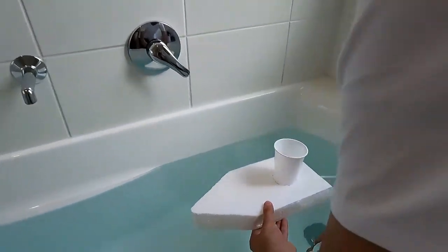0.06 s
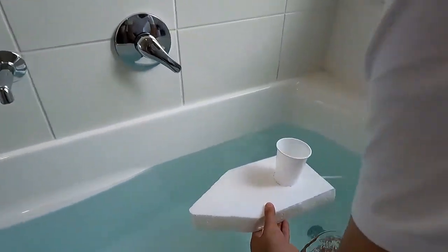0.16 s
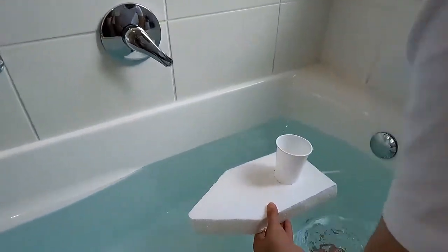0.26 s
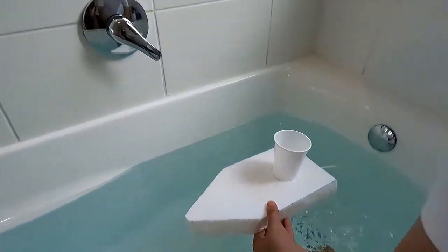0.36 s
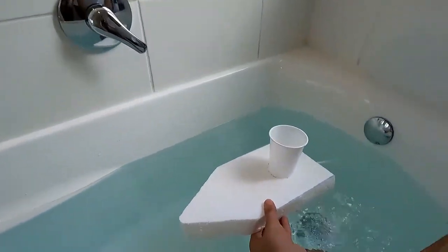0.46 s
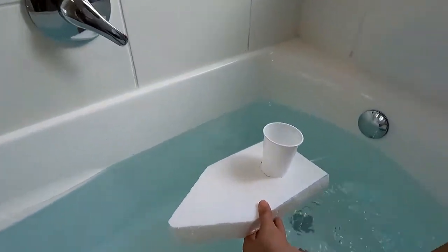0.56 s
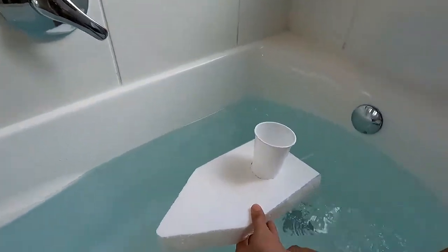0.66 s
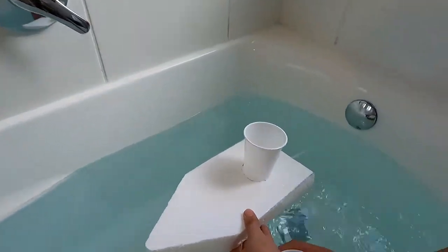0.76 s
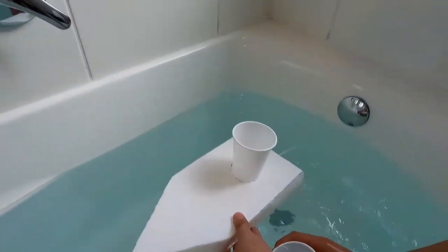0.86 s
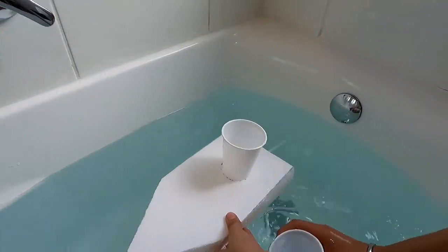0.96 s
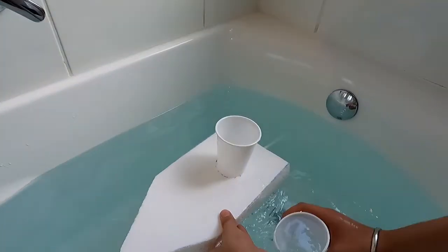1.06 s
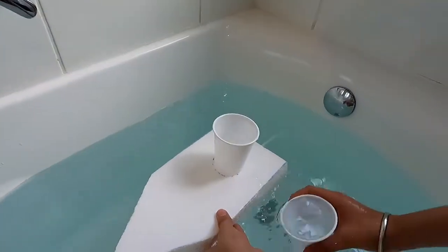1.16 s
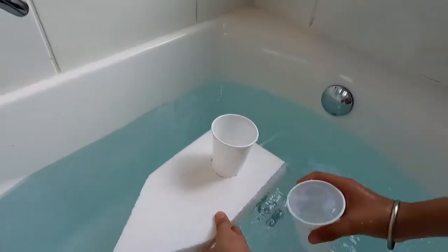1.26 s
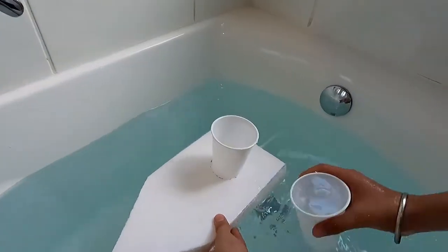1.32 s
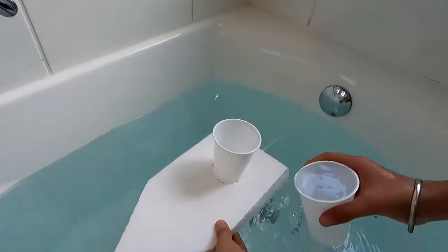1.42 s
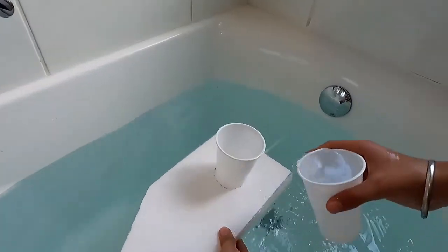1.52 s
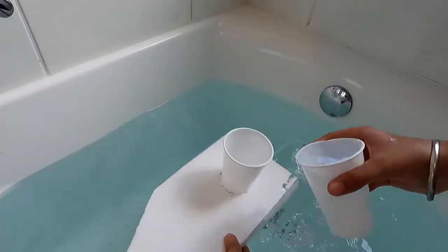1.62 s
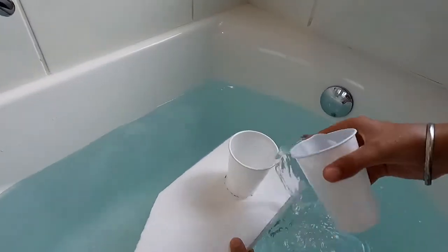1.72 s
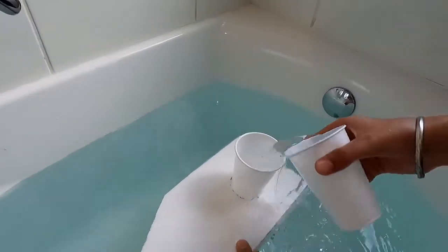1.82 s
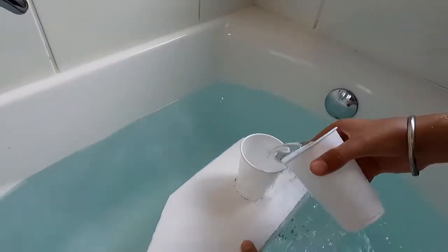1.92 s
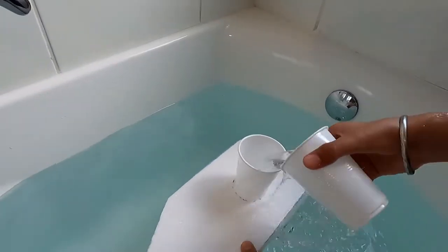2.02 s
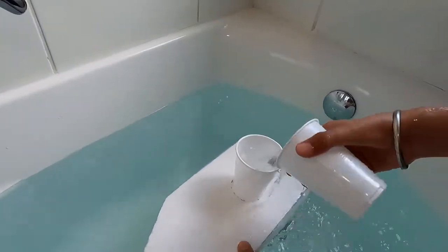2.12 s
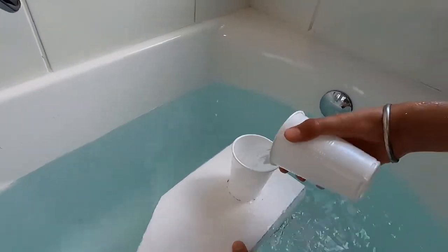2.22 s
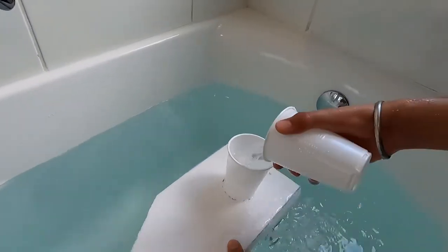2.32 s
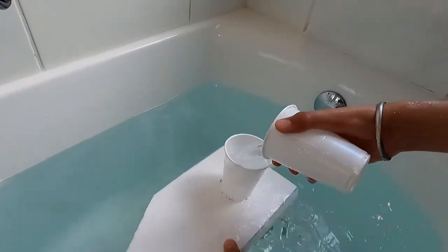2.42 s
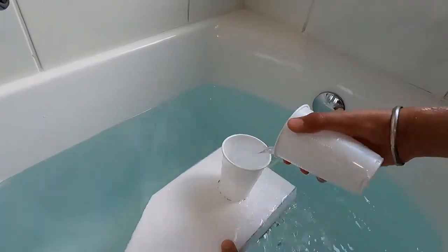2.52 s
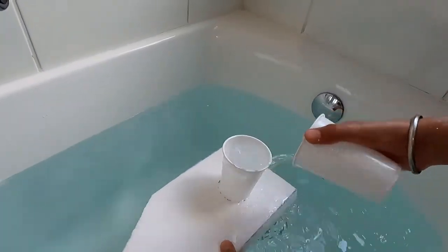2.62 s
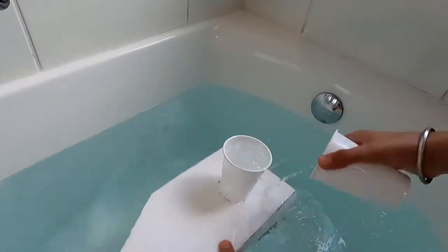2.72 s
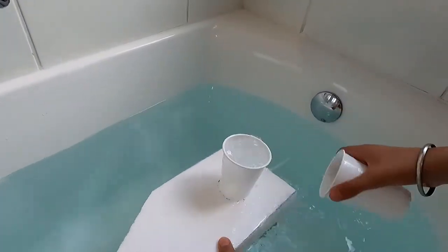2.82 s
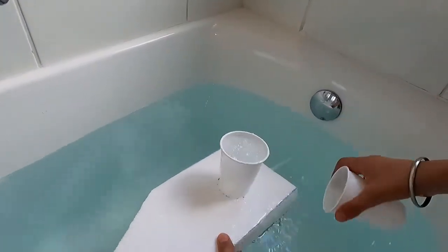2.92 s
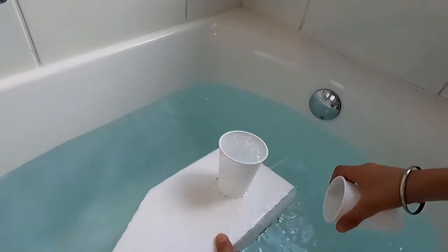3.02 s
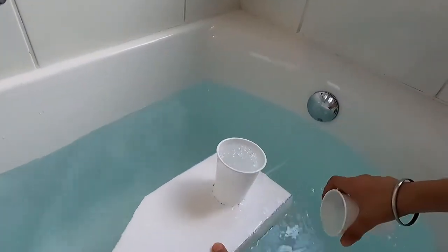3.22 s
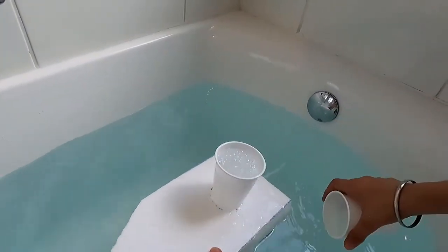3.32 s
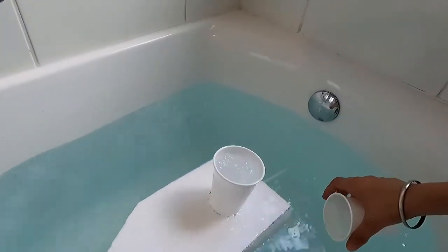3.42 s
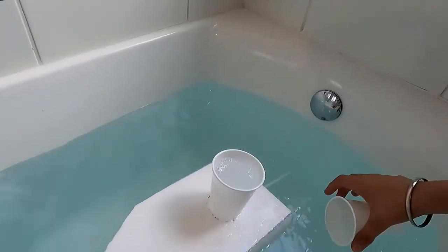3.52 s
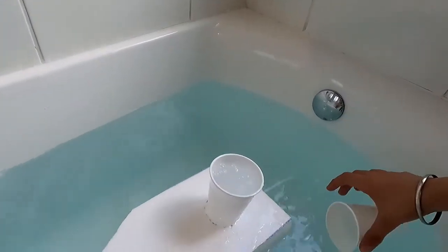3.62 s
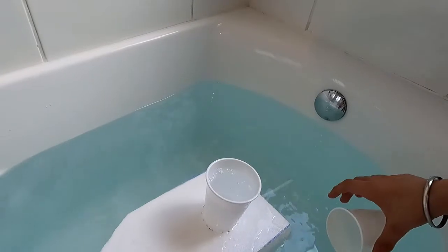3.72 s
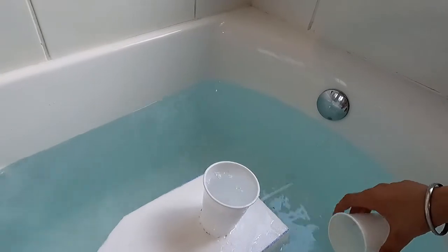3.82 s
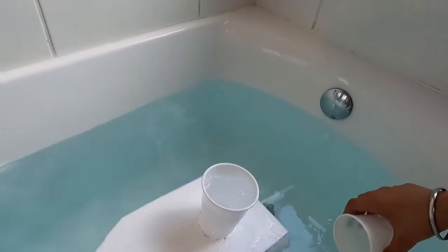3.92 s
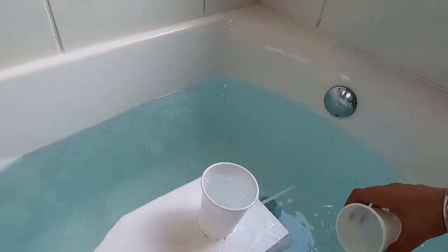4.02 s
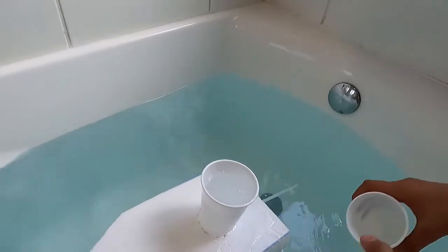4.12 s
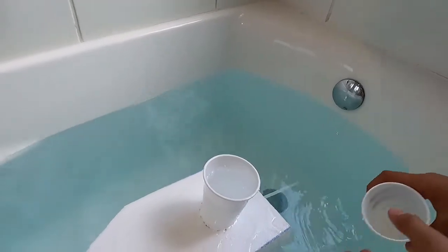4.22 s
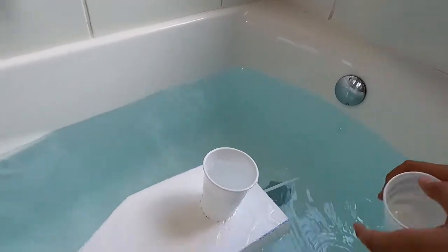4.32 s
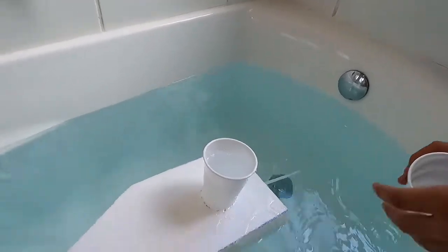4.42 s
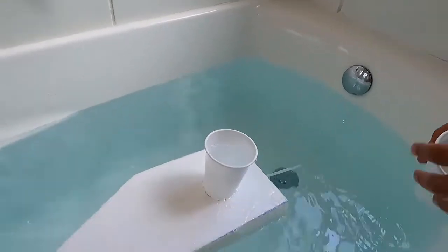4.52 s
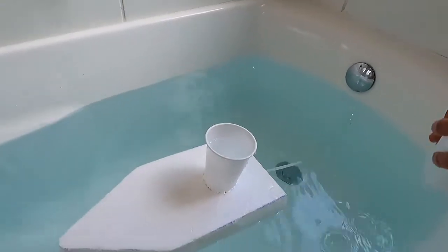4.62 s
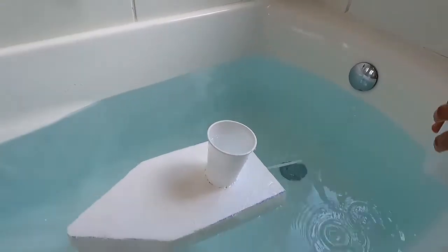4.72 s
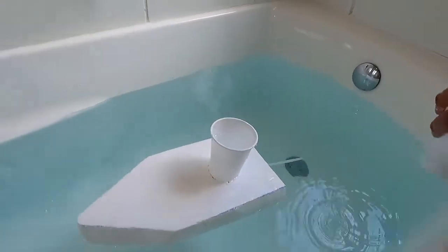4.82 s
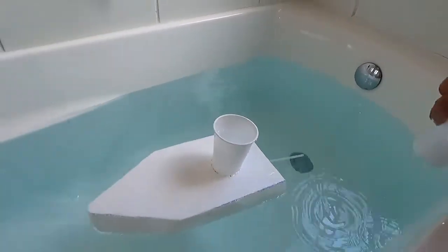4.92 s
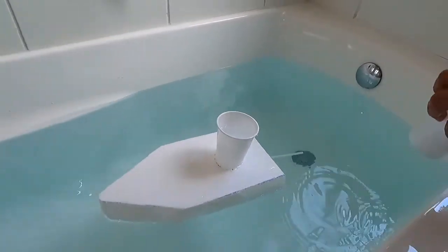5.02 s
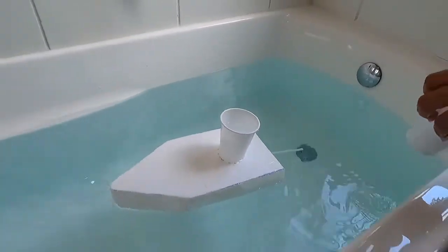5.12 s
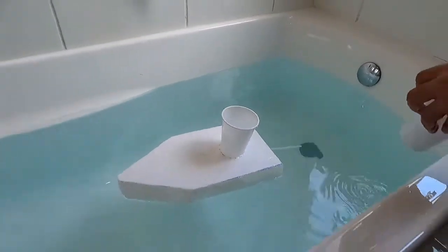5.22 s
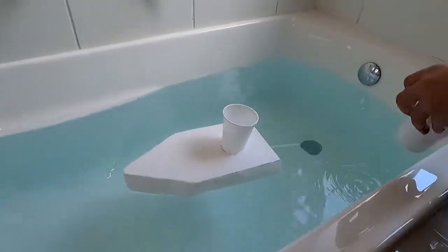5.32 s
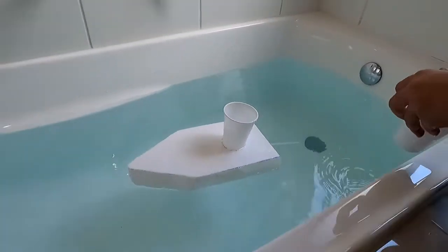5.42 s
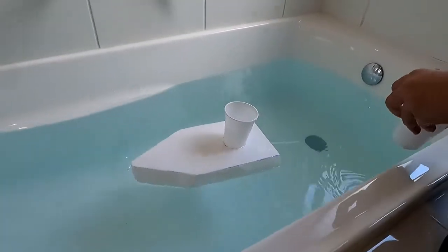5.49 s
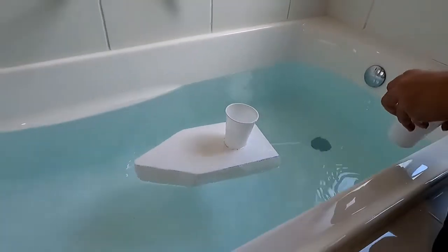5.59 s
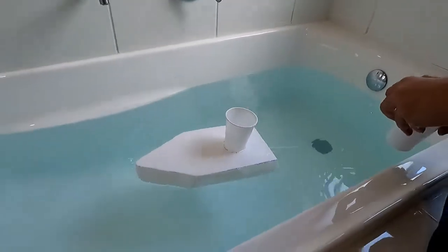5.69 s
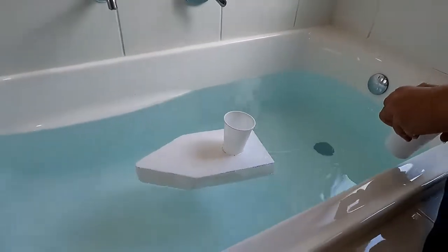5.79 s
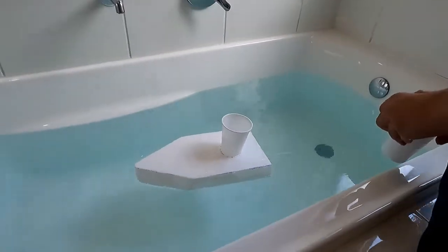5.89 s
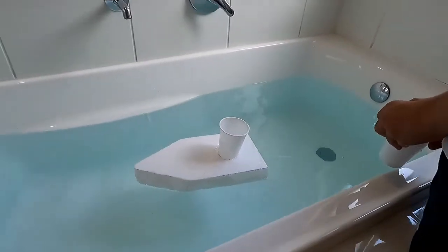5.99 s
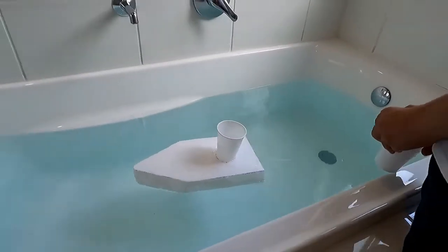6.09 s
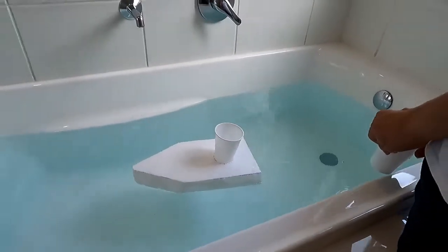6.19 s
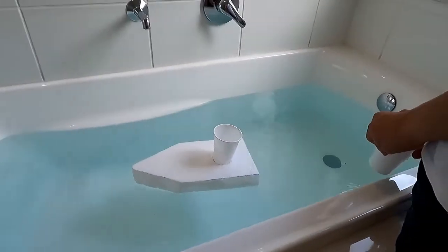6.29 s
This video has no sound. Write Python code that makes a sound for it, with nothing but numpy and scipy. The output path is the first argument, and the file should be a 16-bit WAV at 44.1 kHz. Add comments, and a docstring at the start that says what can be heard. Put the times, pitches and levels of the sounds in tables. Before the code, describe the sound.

A quick deep glug resonates in the bathtub, followed by plinking drops and a sharp wet splat. Bubbly pouring spatters for about a second, then trickles away into faint droplets. A crisp double click rings, fabric rubs beside the microphone amid soft low thuds, and a single dry knock sounds. Tiles add a bright short reverberation over faint low room noise.

```python
"""A plastic cup dipped into a full bathtub gulps at a mostly rising pitch: its shrinking air excites the tub.
Drops fall, then the cup is emptied into a second cup and over the water, and a late double click rings; bubbles
are damped sines whose crowds make gurgle, slosh and fizz, and the tiled bathroom adds echoes and a decaying tail.
Later clothes rustle and rub as shaped noise and a single knock sounds, over low lumps and faint room noise."""
import sys
import numpy as np
from scipy import signal
from scipy.fft import rfft, irfft, next_fast_len
from scipy.io import wavfile
from scipy.ndimage import map_coordinates

SR = 44100
rng = np.random.default_rng(int(sys.argv[2]) if len(sys.argv) > 2 else 0)


def file_out(sig):
    """Save sig as 16-bit WAV at sys.argv[1]."""
    # one column per channel
    cols = np.atleast_2d(sig).T
    # limit, then scale
    lim = np.clip(cols, -1, 1)
    pcm = np.round(lim * 32767).astype(np.int16)
    wavfile.write(sys.argv[1], SR, pcm)


N = 280035

KNOCK_S = 5.2525
STREAM_END_S = 3.8


def gulp():
    """Cavity resonance: as the sinking cup's air shrinks its note climbs and, with the churn, excites the tub."""
    # air pocket of the dipped cup: t/s, mean pitch f/Hz, relative level/dB
    air_pocket = [(.07, 134.2, -40), (.115, 152.6, -30), (.17, 184.6, -38), (.21, 237.1, -32),
                  (.245, 255.5, -32), (.258, 350, -24.5), (.285, 402, -23.5), (.3, 410.5, -38.5),
                  (.345, 418, -26.5), (.356, 581, -25.5), (.41, 586, -31)]
    # air modes of tub and room: f/Hz, width/Hz, relative level/dB
    tub_modes = [(182, 14, -15), (250.7, 6.3, -3), (282, 8.3, -16), (340, 12, -3), (401, 12.3, -9),
                 (433, 7.5, -9.5), (578, 21, -13.5), (730, 59, -19)]
    # water rushing into the cup: f/Hz, relative level/dB
    churn_spectrum = [(30, -9), (80, -10.5), (250, 2), (450, -5), (800, -10.5), (1500, -11), (3000, -53)]
    hz, db = curves(air_pocket)
    t = np.arange(N) / SR
    fade_in = np.clip((t - air_pocket[0][0]) / 0.025, 0, 1)
    fade_out = np.clip((air_pocket[-1][0] - t) / 0.036, 0, 1)
    wavering_hz = hz * (1 + 0.018 * wobble(61.3))
    note = np.sin(2 * np.pi * np.cumsum(wavering_hz) / SR)
    churn = amp(3.5 * wobble(44.5) - 17.0) * rush(churn_spectrum, side_db=-20.5)
    air = fade_in * fade_out * amp(db) * (note + churn)
    flutter = amp(15.0 + 4 * wobble(29.35))
    return amp(-8.5) * air + flutter * filtered(air, resonances(tub_modes))


def stream():
    """Bubble acoustics of running water: gurgle at the cup's air pitch, deep slosh, crackling fizz and a hiss."""
    # surges: t/s, full flow lasts t/s, relative gurgle level/dB, relative fizz level/dB, gurgle f/Hz,
    # climb/(Hz/s), pitch spread/log ratio, fizz f/Hz
    surges = [(0, 0.093, -72, -52.5, 1150, -5.5, 0.14, 6400), (0.25, 0.13, -39, -52, 1397, -800, .3, 3800),
              (0.409, 0.016, -30.5, -37, 2334, -300, 0.16, 3800),
              (.56, 0.22, -49.5, -46, 1827, -900, 0.3, 5600),
              (0.8, 0.22, -42.5, -40.5, 1149, 906.5, 0.27, 6200),
              (1.45, 0.15, -68, -50.5, 2010, -900, .15, 4500),
              (1.851, 0.018, -39, -28.5, 1450, -300, 0.27, 4500),
              (1.97, 0.057, -34.5, -32, 1015, 292, .15, 4200), (2.15, 0.18, -29, -32, 1302, 201, .11, 4000),
              (2.562, 0.16, -39, -40, 2210, 589.5, 0.25, 4000),
              (3.04, 0.015, -41.5, -42, 1964, -500, 0.19, 4500)]
    # stirring of the bath water: t/s, full level lasts t/s, level/dB
    stirrings = [(.36, 0.054, -41), (1.97, 0.46, -47.5)]
    # hiss: f/Hz, relative level/dB
    hiss_spectrum = [(410, -55), (700, -18), (1160, -4), (1290, -15), (1870, -2.5), (4890, -15.5),
                     (12300, -22), (15500, -72)]
    s, held, gurgle_db, fizz_db, start_hz, climb, spread, fizz_hz = np.transpose(surges)
    t = np.arange(N) / SR
    # the latest surge sets the pitch, from 40 ms before its full flow
    k = np.clip(np.searchsorted(s - .04, t) - 1, 0, None)
    hz = start_hz[k] + climb[k] * np.clip(t - s[k], 0, held[k] + 0.19)
    gurgle = swarm(count=3500, hz=hz, spread=spread[k], cycles=7.1, uneven_db=7, size=800)
    slosh = swarm(count=4000, hz=np.full(N, 700.), spread=np.full(N, 0.5), cycles=2.7, uneven_db=1.5, size=1100)
    fizz = swarm(count=24000, hz=fizz_hz[k], spread=np.full(N, 0.3), cycles=4.2, uneven_db=6.5, size=180)
    hiss = rush(hiss_spectrum, side_db=-1.0) * amp(0.69 * wobble(29.26) - 1.5)
    gurgle_gain = swells(s, held, gurgle_db - 4.5, rise=260, fall=81)
    slosh_gain = swells(*np.transpose(stirrings), rise=500, fall=46)
    fizz_gain = swells(s, held, fizz_db - 6.5, rise=500, fall=51)
    return gurgle_gain * gurgle + slosh_gain * slosh + fizz_gain * (fizz + hiss)


def drops():
    """Entrained bubbles ring under falling drops, struck cup walls ring longer, and splats add noisy spray."""
    # bubbles under single drops: t/s, starting f/Hz, relative level/dB, ring/cycles to -20 dB
    drop_bubbles = [(.2375, 1247, -27.5, 12.4), (0.2358, 1734, -29.5, 36), (0.3376, 4670, -31, 17),
                    (0.356, 1505, -23, 14), (.357, 3550, -31.5, 23), (0.3877, 1130, -11, 3.8),
                    (0.388, 2900, -17.5, 17), (.3897, 2240, -20, 11), (.4031, 2004, -5.5, 5.1),
                    (.4031, 2393, -13, 11), (0.6051, 1050, -28, 5.8), (.803, 2300, -24, 5.5),
                    (.811, 1105, -12, 3.8), (.8633, 923, -22.5, 8.4), (0.8872, 1250, -22.5, 7.5),
                    (.904, 2660, -11.5, 3.7), (.9626, 3600, -22.5, 11.6), (.969, 6240, -18, 6.4),
                    (0.9826, 1181, -9, 8.1), (.9817, 2060, -18, 12), (0.984, 4600, -23, 9.5),
                    (1.009, 1250, -22, 18), (1.098, 5760, -29, 11), (1.19, 2850, -33, 8.4),
                    (1.394, 1880, -45.5, 29), (1.3951, 4430, -8, 7.8), (1.3958, 6730, -10, 8.9),
                    (1.3946, 11600, -11.5, 8.2), (1.5262, 3830, -17.5, 4.8), (1.5479, 1950, -31.5, 15),
                    (1.7152, 1670, -37, 19), (1.7341, 3890, -22.5, 6.2), (1.79, 3280, -27, 8.4),
                    (1.8079, 5000, -12, 5.3), (1.818, 5960, -24, 10), (1.8261, 1992, -8.5, 20),
                    (1.8261, 2400, -19, 21), (1.839, 1080, -24.5, 20), (1.8695, 794, -34, 21),
                    (1.8915, 4700, -23, 19), (1.962, 1025, -20.5, 6.7), (1.9974, 4730, -6.5, 3),
                    (2.0657, 1580, -17, 7.4), (2.092, 3700, -13.5, 6.5), (2.147, 5960, -11.5, 4.7),
                    (2.2546, 1294, -12, 7.7), (2.255, 11200, -32, 16), (2.271, 3500, -11.5, 4.2),
                    (2.3043, 2340, -12.5, 4.7), (2.3316, 1290, -8, 2.3), (2.334, 5070, -10.5, 3.4),
                    (2.495, 3900, -25, 8.8), (2.5658, 4100, -22, 13), (2.567, 845, -22, 3.4),
                    (2.611, 3380, -24, 5.9), (2.681, 1297, -27.5, 7.5), (2.684, 2440, -31, 10),
                    (2.712, 2330, -35, 18), (2.7477, 826, -26, 2.8), (2.7619, 386, -31, 2.8),
                    (2.7625, 2480, -21, 6.7), (2.8585, 2050, -19.5, 4.2), (2.9305, 4640, -14.5, 3),
                    (2.9865, 3770, -18, 3.2), (3.0264, 1860, -18.5, 9.1), (3.0261, 2530, -18.5, 6.9),
                    (3.0442, 2120, -19.5, 10.3), (3.139, 8700, -36, 18), (3.146, 3100, -26, 5.9),
                    (3.219, 932, -35.5, 4.4), (3.3735, 1855, -24.5, 5.2), (3.392, 4950, -22.5, 4.9),
                    (3.5525, 4580, -28.5, 6.6), (3.957, 1144, -48.5, 8.5), (4.215, 5070, -33, 2.4),
                    (4.261, 9500, -34.5, 4), (4.241, 10600, -33.5, 6.6), (5.201, 3190, -37, 4.6),
                    (5.4894, 4000, -28.5, 4.5), (5.529, 4470, -30, 5.2)]
    # drops that strike a cup and leave its wall ringing: t/s, f/Hz, mean level/dB, ring/cycles to -20 dB
    wall_rings = [(1.547, 1800, -47.5, 180), (1.5487, 2010, -46.5, 170), (1.7144, 1652, -43, 200)]
    # bursts of fine spray: t/s, relative level/dB
    splats = [(.523, -40.5), (0.6065, -33.5), (0.9087, -28.5), (0.97, -28), (1.02, -35), (1.098, -36.5),
              (1.347, -40.5), (1.395, -17), (1.7316, -30), (1.756, -29), (1.8894, -29), (2.061, -36),
              (2.0901, -20), (2.148, -27), (2.269, -21), (2.3351, -25.5), (2.569, -29.5), (2.671, -26.5),
              (2.7611, -36), (2.817, -33), (2.859, -31.5), (2.9832, -35), (3.027, -35), (3.045, -46),
              (3.143, -35), (3.375, -31), (3.551, -37)]
    # spray: f/Hz, gain/dB
    spray_spectrum = [(800, -35), (2500, 3), (5000, 9.5), (9000, -1), (12000, -6.5), (15500, -12)]
    s, hz, db, cycles = np.transpose(drop_bubbles)
    pan_db = 1.124 * rng.standard_normal(len(s))
    plinks = bubbles(s, hz, cycles, amp(db + 5.0), pan_db, rise=0.027, size=4000)
    s, hz, db, cycles = np.transpose(wall_rings)
    rings = amp(2.5 * wobble(50)) * bubbles(s, hz, cycles, amp(db), 0 * hz, rise=0, size=12000)
    spray = bursts(*np.transpose(splats), attack=0.0015, t60=0.019, spectrum=spray_spectrum)
    return plinks + rings + spray


def ticks():
    """Strong damping: the faint, bright droplets shed by the wet cup last only a few cycles."""
    # droplets: t/s, relative level/dB, starting f/Hz
    droplets = [(3.7984, -49, 5570), (3.824, -45, 6400), (3.8824, -48, 3360), (3.9348, -39, 6900),
                (3.956, -44.5, 3530), (3.9904, -46, 4460), (4.0304, -43, 4360)]
    s, db, hz = np.transpose(droplets)
    return bubbles(s, hz, 1.8 + 0 * s, amp(db + 15), rng.standard_normal(len(s)), rise=0.066, size=200)


def double_click():
    """Damped oscillation: two close clicks, probably a late drop, with a fluttering ring near 1 and 2.3 kHz."""
    # ring of the double click: f/Hz, mean level over the click/dB, ring/cycles to -20 dB
    ring_modes = [(940, -25, 140), (970, -28, 140), (1019, -22, 113), (2340, -5, 15), (2312, -28, 130)]
    # clicks: f/Hz, gain/dB
    click_spectrum = [(800, -22), (2000, 5.5), (4500, 6.5), (7300, 8), (9000, -8.5), (15500, -20.5)]
    first_s, base_db = 4.307, -22.5
    hz, db, cycles = np.transpose(ring_modes)
    ring = bubbles(np.full(len(hz), first_s), hz, cycles, amp(base_db + db), 0 * hz, rise=0, size=12000)
    # a stronger click follows the first by 3.9 ms
    click_s = first_s + np.array([0, 0.0039])
    click_db = base_db + np.array([-2., 4.])
    clicks = bursts(click_s, click_db, attack=0.0019, t60=0.014, spectrum=click_spectrum)
    return amp(4.5 * wobble(60)) * ring + clicks


def person():
    """Friction noise: clothes rustle and rub in broad bands; low lumps are noise split into deep and thud."""
    # movements by the tub: t/s, held t/s, mean rustle level/dB, mean rub level/dB
    moves = [(3.959, 0.028, -62.5, -55), (4.33, 0.05, -52.5, -72), (4.5, 0.11, -52, -81),
             (4.8, 0.088, -59, -58), (4.94, 0.064, -48.5, -56), (5.1, 0.11, -53.5, -48.5),
             (5.28, 0.058, -46.5, -56), (5.489, 0.055, -48, -55), (5.64, 0.076, -58, -60),
             (5.83, 0.06, -54.5, -59), (5.961, 0.12, -67.5, -59.5), (6.221, 0.084, -68.5, -65.5)]
    # rustle: f/Hz, relative level/dB
    cloth_spectrum = [(350, -15), (600, -14.5), (1100, -5.5), (2600, -9.5), (3570, -12.5), (7000, -18),
                      (12500, -36), (15500, -30)]
    # rub: f/Hz, relative level/dB
    rub_spectrum = [(100, -43), (150, -2), (260, 1.5), (400, -6), (800, -14.5), (1300, -39), (2000, -64)]
    # low lumps: t/s, held t/s, deep level/dB, thud level/dB
    jolts = [(.09, 0.1, -66, -45.5), (.9, 0.075, -62, -57), (4.18, 0.081, -59, -54.5),
             (4.38, 0.022, -46.5, -71), (4.57, 0.034, -61, -42.5), (4.781, 0.021, -63, -51.5),
             (4.96, 0.017, -70, -56.5), (5.18, 0.11, -51, -74), (5.33, 0.1, -53, -72),
             (5.62, .03, -68, -56), (5.74, 0.076, -56, -66), (5.93, 0.18, -53.5, -54.5),
             (6.199, 0.24, -52.5, -60.5)]
    # lumps before the split: f/Hz, relative level/dB
    rumble_spectrum = [(12, -54.5), (25, -9), (70, -2), (110, -11), (200, -10.5), (400, -85)]
    s, held, rustle_db, rub_db = np.transpose(moves)
    grain = amp(1.5 * wobble(37))
    cloth = swells(s, held, rustle_db, rise=285, fall=79) * grain * rush(cloth_spectrum, side_db=-5.5)
    rub_grain = amp(0.25 * wobble(48))
    rub = swells(s, held, rub_db, rise=330, fall=140) * rub_grain * rush(rub_spectrum, side_db=-7)
    s, held, deep_db, thud_db = np.transpose(jolts)
    rumble = amp([[-1.5], [1.5]]) * rush(rumble_spectrum, side_db=-17.0)
    deep = filtered(rumble, lambda hz: 1 / (1 + (hz / 41.4) ** 6))  # split at 41.4 Hz
    thud = rumble - deep
    deep_lumps = swells(s, held, deep_db, rise=350, fall=240) * unit(deep)
    thud_lumps = swells(s, held, thud_db, rise=350, fall=240) * unit(thud)
    return cloth + rub + deep_lumps + thud_lumps


def knock_crack():
    """Impulsive excitation: the knock opens with a very short broadband burst."""
    # crack: f/Hz, gain/dB
    crack_spectrum = [(300, 9), (1000, 14), (2500, 10.5), (6000, 8.5), (9000, -20), (15500, -27)]
    burst = bursts(np.array([KNOCK_S]), np.array([-20]), attack=0.00016, t60=0.0086, spectrum=crack_spectrum)
    return amp([[-1.5], [1.5]]) * burst


def knock_body():
    """Damped modes: two low tones swell and die just after the crack of the knock."""
    # low modes of the knocked case: f/Hz, relative level/dB, t60/s
    case_modes = [(38, -25.5, 0.18), (131, -11, 0.026)]
    t = np.maximum(np.arange(N) / SR - KNOCK_S - .003, 0)
    modes = sum(amp(db - 60 * t / t60) * np.sin(2 * np.pi * hz * t) for hz, db, t60 in case_modes)
    onset = 1 - np.exp(-t / 0.0023)
    return amp([[-1.5], [1.5]]) * -onset * modes


def room_air():
    """Stationary noise: a faint background weighted to low frequencies."""
    # room air: f/Hz, relative level/dB
    air_spectrum = [(15, -43), (30, -12), (70, -6.5), (105, -20), (160, -3), (230, -7.5), (320, -16.5),
                    (700, -26), (1100, -19.5), (3500, -37), (5500, -25.5), (8000, -31.5), (10000, -41.5),
                    (14000, -44)]
    return amp(-58.0) * rush(air_spectrum, side_db=-4.0)


def bathroom(x):
    """Reverberation: early copies from the tub sides, then a tail whose decay time depends on frequency."""
    # decay between the tiles: f/Hz, t60/s
    tile_decay = [(200, 0.93), (800, 0.75), (2000, 0.7), (5500, 0.52), (12000, 0.39)]
    # reflections from the tub sides: delay t/s, level/dB
    tub_sides = [(.0021, -15.5), (.0043, -11.5), (.0075, -16), (.027, -26.5)]
    hz, t, z = signal.stft(rng.standard_normal((2, SR)), SR, nperseg=256)
    decay = amp(-60 * t / along(tile_decay, hz)[:, None])
    tail = signal.istft(z * decay, SR, nperseg=256)[1]
    tail = tail + 0.33 * tail[::-1]  # the channels partly share their tails
    onset = np.clip(np.arange(tail.shape[1]) / (0.0055 * SR), 0, 1)
    tail = amp(-4) * tail / np.linalg.norm(tail[0]) * onset
    for k, (s, db) in enumerate(tub_sides):
        # the second channel is alternately one sample later and earlier
        delay = round(s * SR)
        tail[[0, 1], [delay, delay + (-1) ** k]] += amp(db)
    return x + signal.fftconvolve(x, tail, axes=1)[:, :N]


def bubbles(s, hz, cycles, gain, pan_db, rise, size):
    """Damped oscillation: sines, upward-gliding if rise > 0 as a bubble nears the surface; cycles = turns to -20 dB."""
    turns = hz[:, None] * np.arange(size) / SR
    age = turns / np.clip(cycles, .5, 400)[:, None]
    envelope = amp(-20 * age) * (1 - np.exp(-turns / 1.36))
    tone = np.sin(2 * np.pi * turns * (1 + rise * np.minimum(age, 2)))
    wave = gain[:, None] * envelope * tone
    at = (np.round(s * SR).astype(int)[:, None] + np.arange(size)).ravel()
    channels = []
    for way in (1, -1):
        panned = wave * amp(way * pan_db / 2)[:, None]
        channels.append(np.bincount(at, panned.ravel(), N + size)[:N])
    return np.array(channels)


def swarm(count, hz, spread, cycles, uneven_db, size):
    """Superposition: a dense crowd of random bubbles around a pitch curve, rms 1 while the stream lasts."""
    u, g = rng.random((count, 2)), rng.standard_normal((count, 3))
    s = u[:, 0] * STREAM_END_S
    at = (s * SR).astype(int)
    pitch = np.clip(hz[at] * np.exp(spread[at] * g[:, 0]), 300, 13000)
    rarity = np.minimum(-np.log(1 - u[:, 1]), 3)  # few bubbles are loud
    ring = cycles * np.exp(0.55 * g[:, 1])
    crowd = bubbles(s, pitch, ring, amp(uneven_db * rarity), 3 * g[:, 2], rise=0.04, size=size)
    return crowd / np.sqrt(np.mean(crowd[:, :round(STREAM_END_S * SR)] ** 2))


def bursts(s, db, attack, t60, spectrum):
    """Transient noise: short coloured puffs that start quickly and decay exponentially."""
    t = np.arange(900) / SR
    envelope = amp(db[:, None] - 60 * t / t60) * (1 - np.exp(-t / attack))
    puffs = envelope * rng.standard_normal((len(s), len(t)))
    at = np.round(s * SR).astype(int)[:, None] + np.arange(len(t))
    train = np.bincount(at.ravel(), puffs.ravel(), N)
    return filtered(train, lambda hz: amp(along(spectrum, hz)))


def swells(s, held, db, rise, fall):
    """Energy addition: events rise, hold and fall in straight slopes (dB per s), their powers summed."""
    t = np.arange(0, N + 64, 64) / SR  # coarse grid, interpolated below
    start, end = np.reshape(s, (-1, 1)), np.reshape(s + held, (-1, 1))
    rising = rise * np.maximum(start - t, 0)
    falling = fall * np.maximum(t - end, 0)
    level = np.reshape(db, (-1, 1)) - rising - falling
    return np.interp(np.arange(N) / SR, t, np.sqrt(np.sum(amp(2 * level), 0)))


def rush(spectrum, side_db):
    """Partial coherence: stereo noise of rms 1 whose channels differ by a second noise at side_db."""
    mid, side = filtered(rng.standard_normal((2, N)), lambda hz: amp(along(spectrum, hz)))
    return unit(np.array([mid + amp(side_db) * side, mid - amp(side_db) * side]))


def resonances(modes):
    """Modal summation: causal second-order responses of (Hz, width, dB) modes with alternating signs."""
    def response(f):
        total = 0
        for k, (centre, width, db) in enumerate(modes):
            damping = 1j * f * width
            total = total + (-1) ** k * amp(db) * damping / (centre * centre - f * f + damping)
        return total
    return response


def filtered(x, response):
    """Linear filtering: the spectrum of x times a complex response of frequency."""
    m = next_fast_len(N + SR // 2)
    return irfft(rfft(x, m) * response(np.fft.rfftfreq(m, 1 / SR)), m)[..., :N]


def wobble(rate):
    """Random modulation: a smooth curve through random knots, rate knots a second."""
    knots = rng.standard_normal(int(N * rate / SR) + 4)
    return map_coordinates(knots, [np.arange(N) * rate / SR])


def curves(rows):
    """Linear interpolation: one value per sample for each column after the time."""
    s, *cols = np.transpose(rows)
    return [np.interp(np.arange(N) / SR, s, c) for c in cols]


def along(points, hz):
    """Logarithmic frequency scale: (Hz, value) points interpolated on a log axis."""
    f, v = np.transpose(points)
    return np.interp(np.log(hz + 1), np.log(f + 1), v)


def amp(db):
    """Decibel law: the amplitude gain of a level in dB."""
    return 10 ** (np.asarray(db) / 20)


def unit(x):
    """Effective value: x scaled to rms 1."""
    return x / np.sqrt(np.mean(x ** 2) + 1e-20)


def scene():
    """Superposition: water and crack reverberate, while person, knock body and room air stay dry."""
    cup = gulp()
    crack = knock_crack()
    # the gulp enters inverted and its direct part is mostly cancelled below, leaving the room's answer
    water = drops() + ticks() + double_click() + stream() - cup
    wet = bathroom(water + amp(-2) * crack)
    return wet + 0.71 * cup + 0.13 * crack + knock_body() + person() + room_air()


def record(dry):
    """Band limitation: treble rolls off steeply around 13.5 kHz and nothing remains from 15.8 kHz up."""
    return filtered(dry, lambda hz: (hz < 15800) / (1 + (hz / 13500) ** 12))


dry = scene()
out = record(dry)
file_out(out)
```